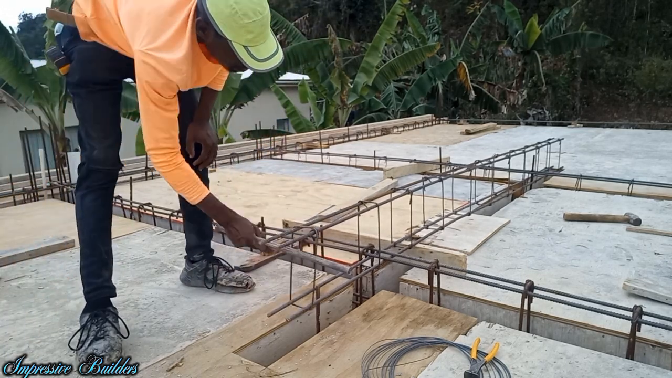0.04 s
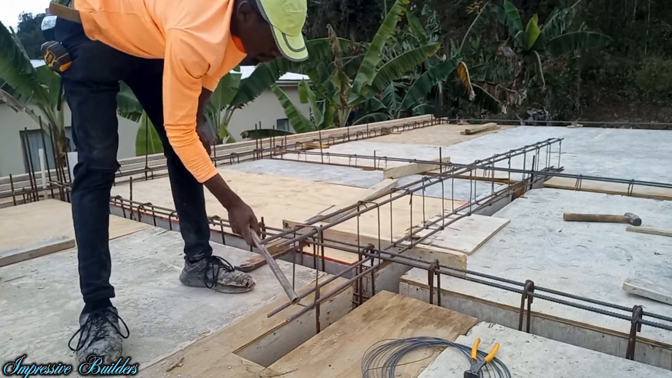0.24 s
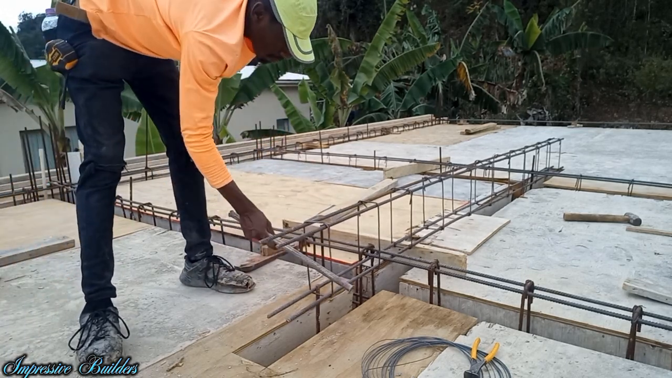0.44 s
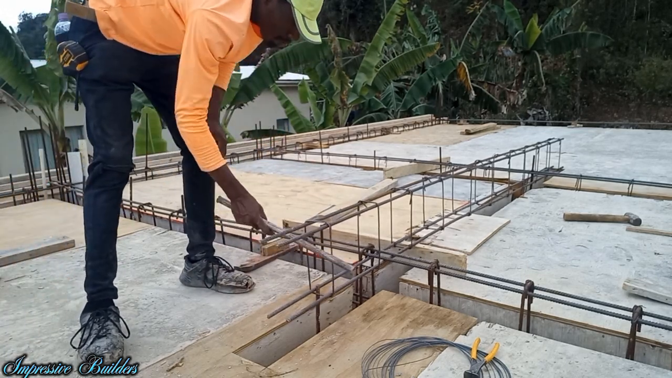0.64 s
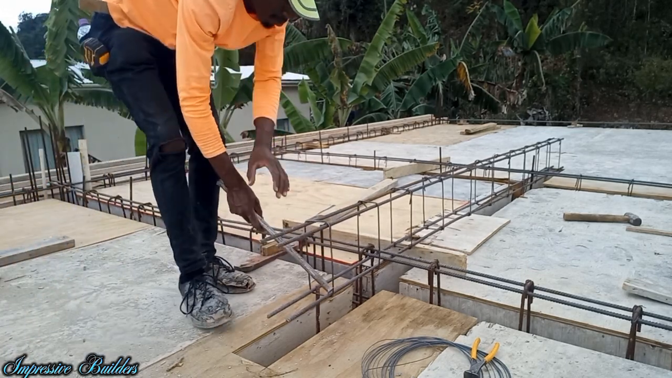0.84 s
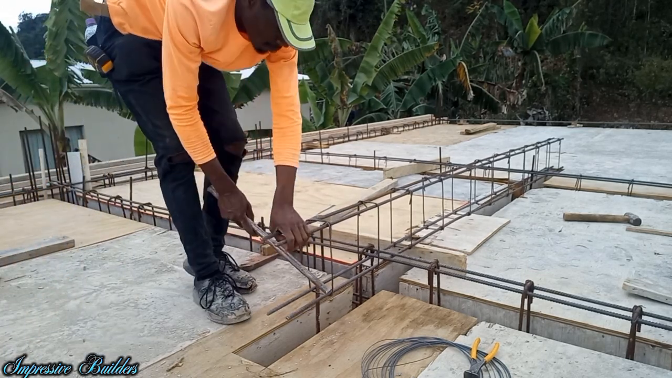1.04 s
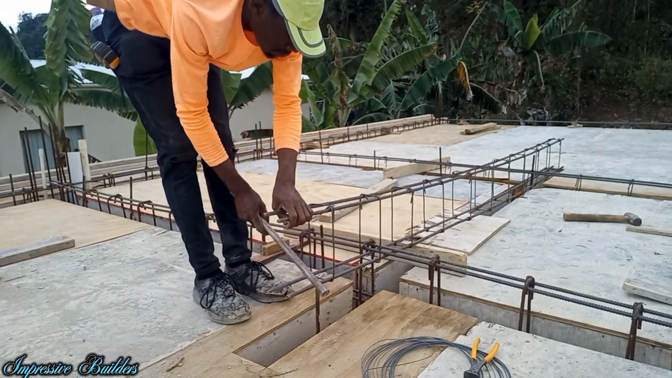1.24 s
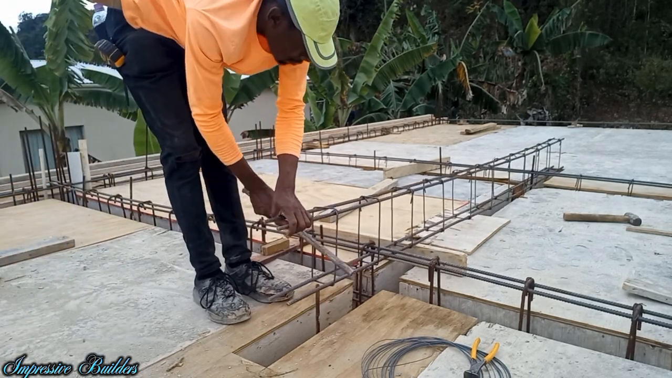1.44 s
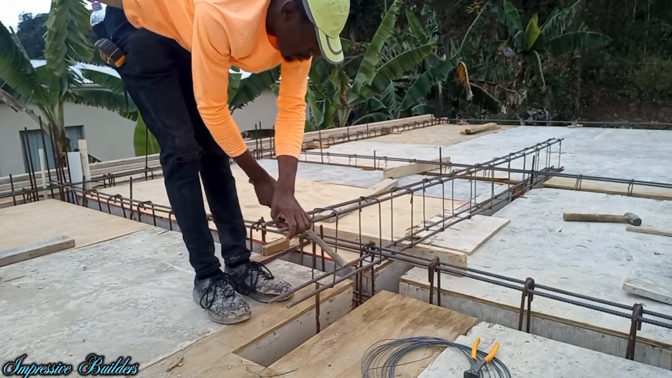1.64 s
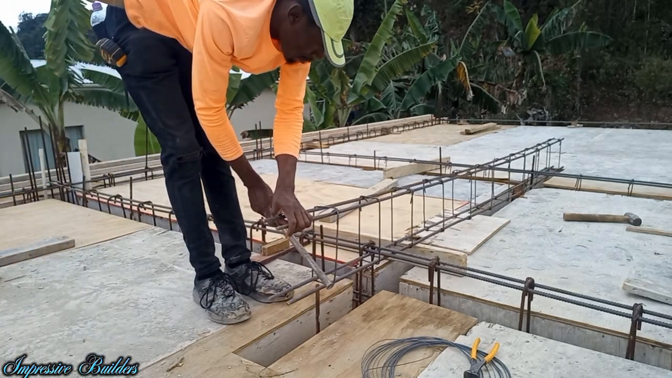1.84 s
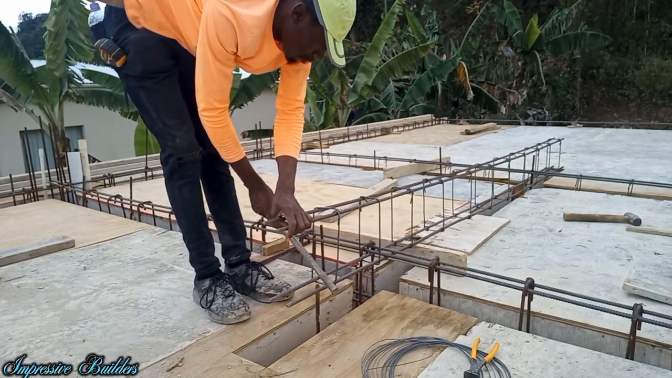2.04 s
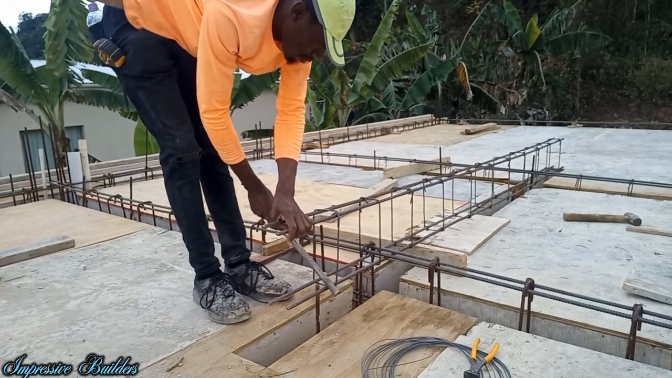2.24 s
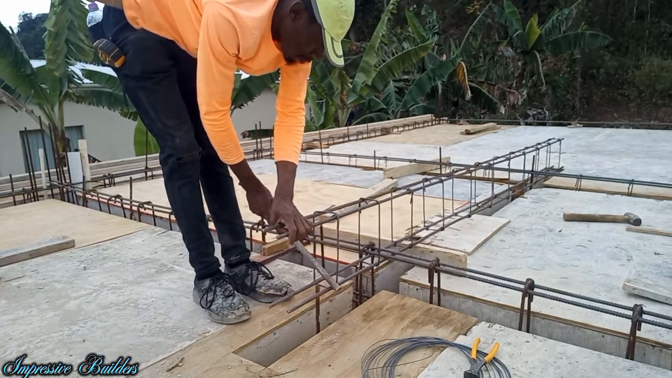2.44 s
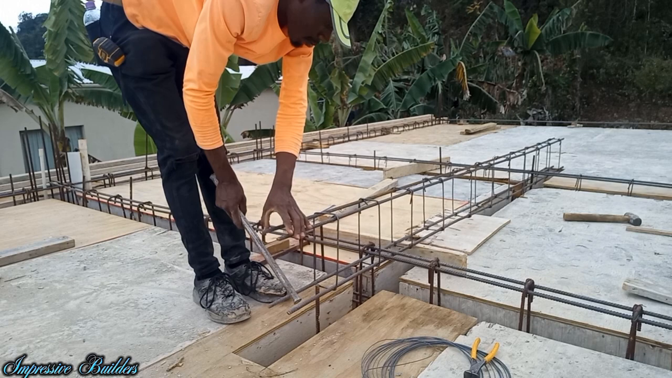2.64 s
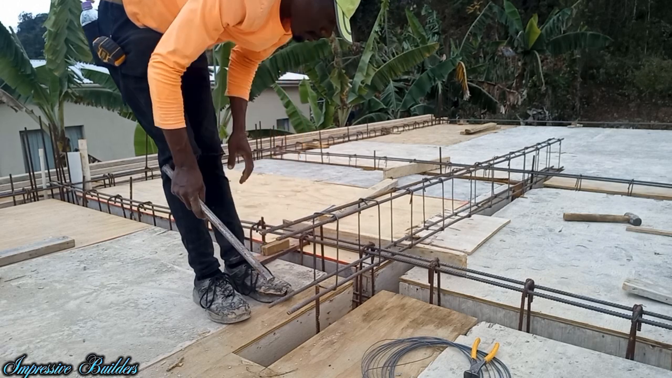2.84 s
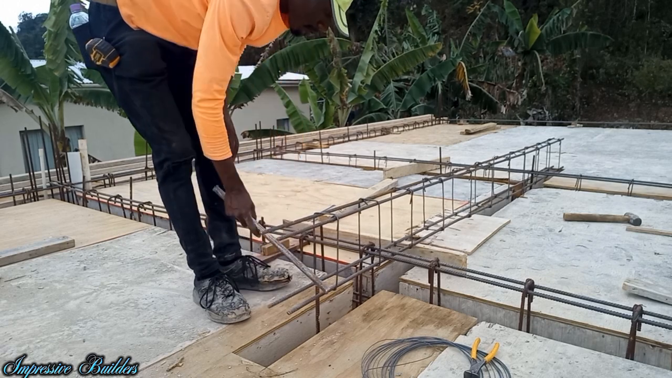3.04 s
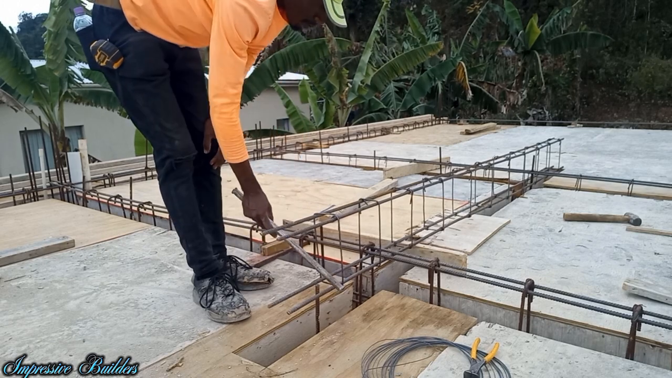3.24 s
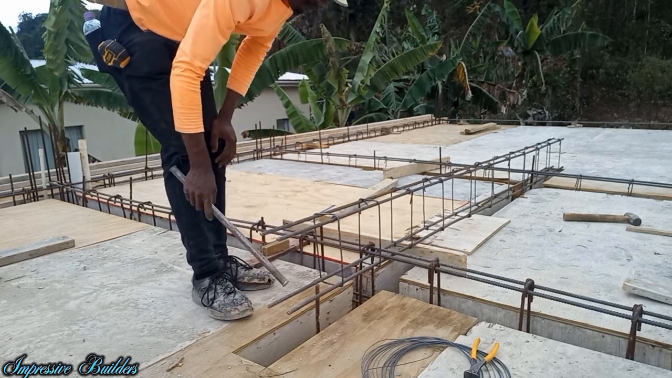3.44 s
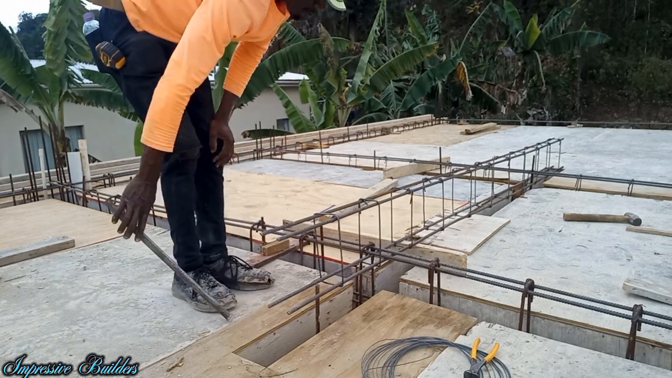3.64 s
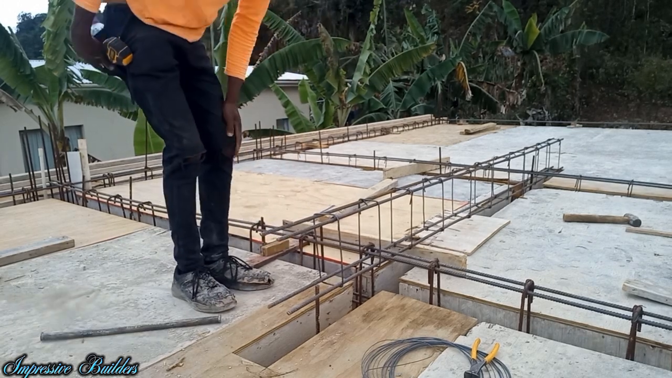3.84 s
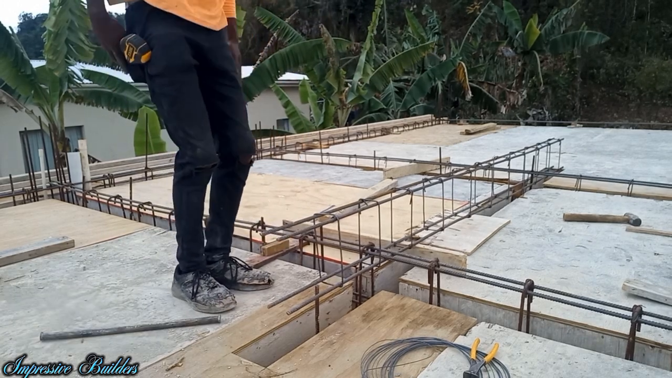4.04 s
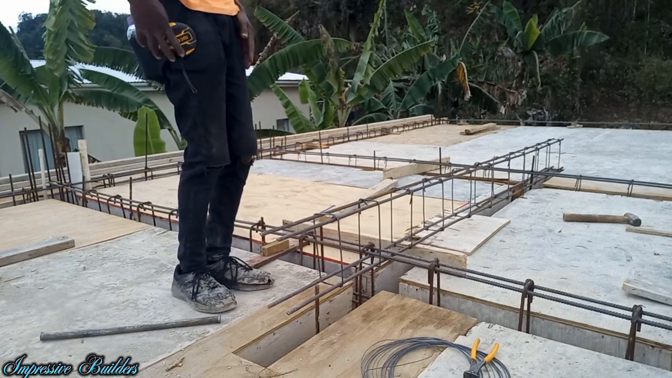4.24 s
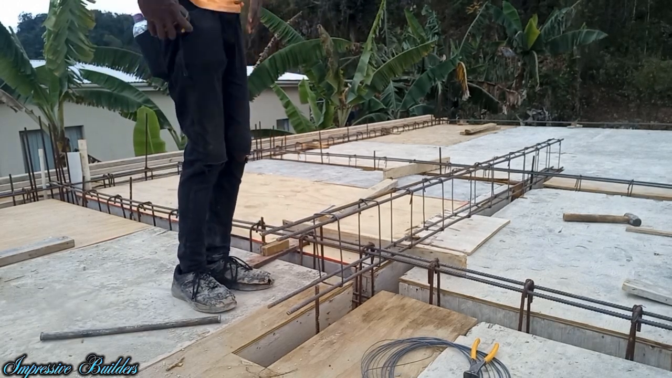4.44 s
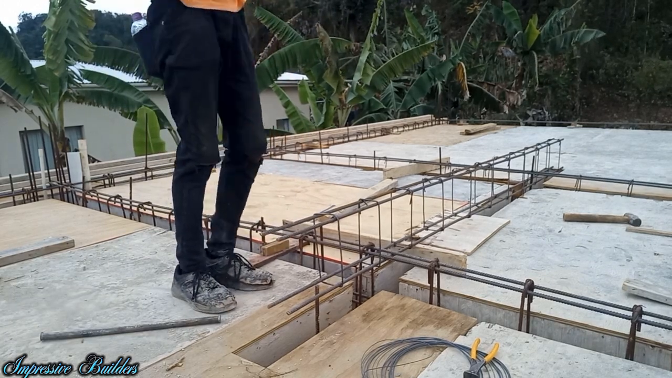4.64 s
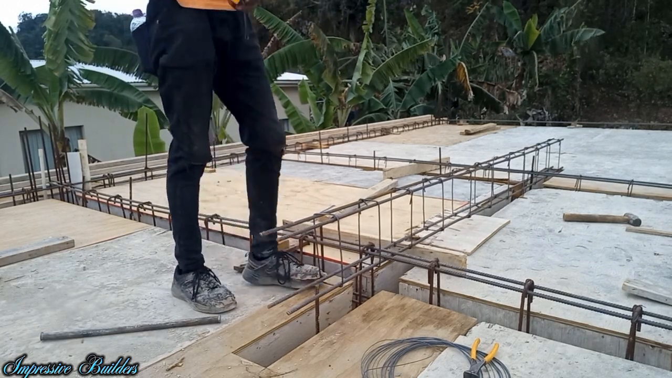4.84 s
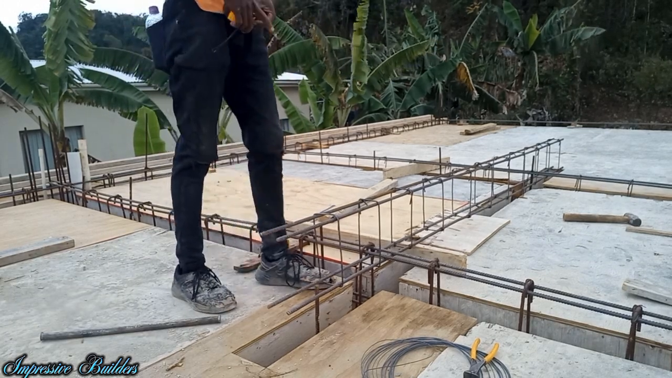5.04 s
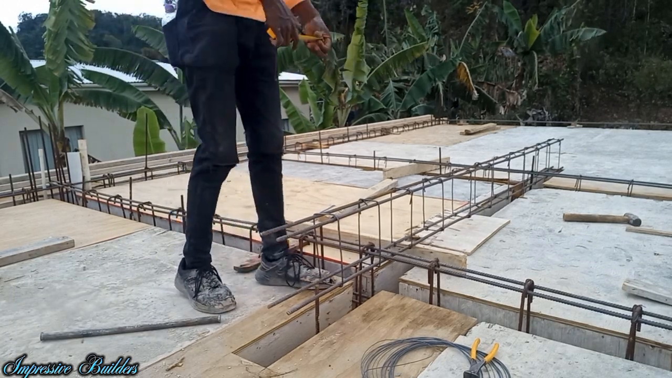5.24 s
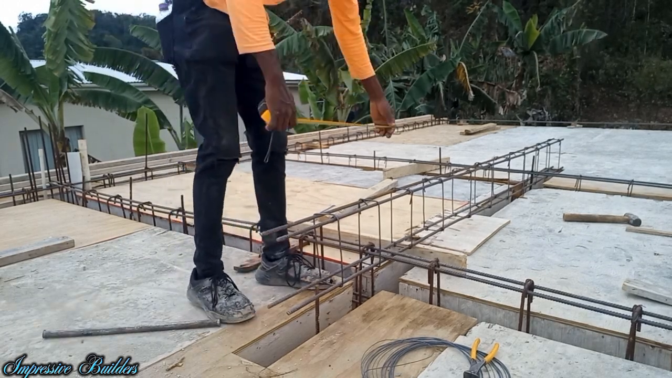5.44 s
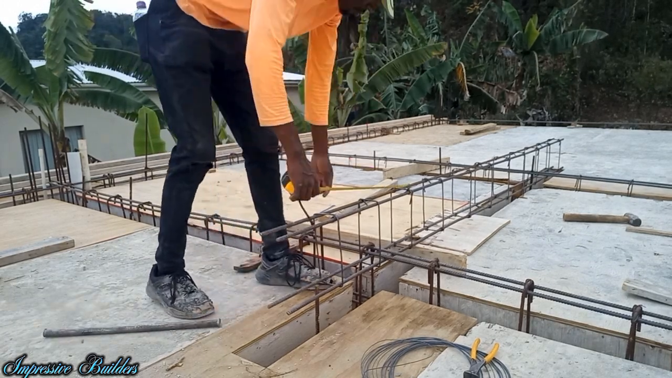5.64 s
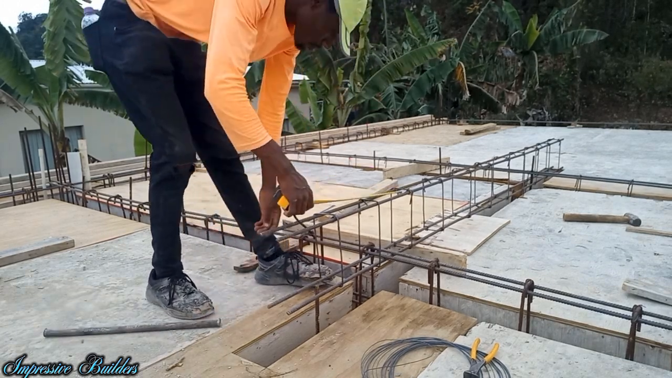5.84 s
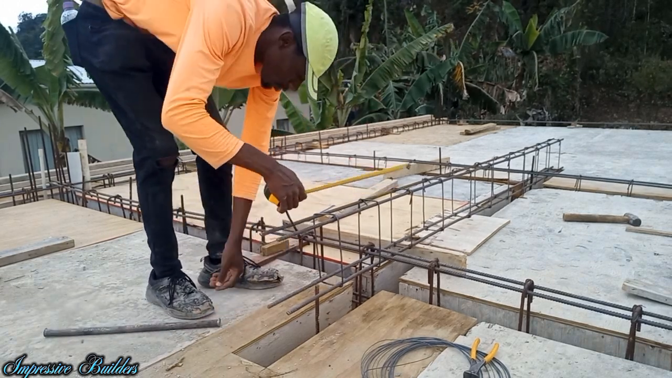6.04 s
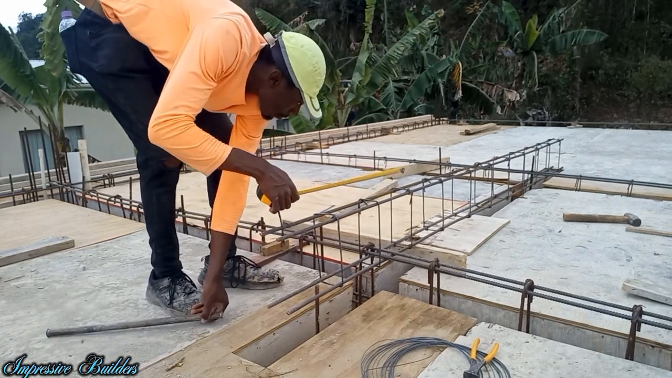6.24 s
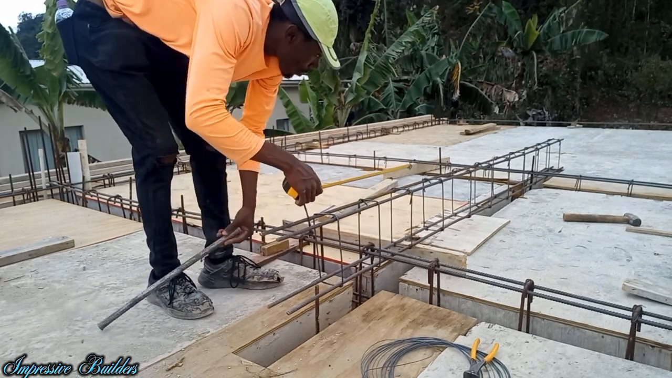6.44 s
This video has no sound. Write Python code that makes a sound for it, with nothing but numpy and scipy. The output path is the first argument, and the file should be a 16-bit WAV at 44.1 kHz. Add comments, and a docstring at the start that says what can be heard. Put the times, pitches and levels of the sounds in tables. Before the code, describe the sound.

Short, irregular rasping clanks of ribbed steel against steel stirrups come first, with a faint wooden shudder beneath. Then a bar falls, touching lightly and slamming hard on the wooden deck, clattering and humming briefly. Near silence with boot scuffs and cloth follows, then a crisp snap and drawn tape hiss, and finally soft clinks as the bar is picked up. Close, dry outdoor pickup with a faint air hush.

```python
"""A steel bar knocks along the stirrups of a rebar cage: gritty bursts of friction ring the steel's modes.
The loose bar drops on a plywood deck and is later picked up: noise cracks, dying deck modes, rattle and hum.
Boots, cloth and a tape drawn along the cage add shaped hiss and short ticks; the deck shudders underneath.
Faint sine hoots and the soft hush of open air, both quiet, complete the scene."""
import sys
import numpy as np
from scipy import signal
from scipy.io import wavfile
from scipy.ndimage import uniform_filter1d

SR = 44100
rng = np.random.default_rng(int(sys.argv[2]) if len(sys.argv) > 2 else 0)


def master_out(mix):
    """Clip the mix to full scale and print it as 16-bit PCM to the path in sys.argv[1]."""
    frames = np.transpose(np.atleast_2d(mix))
    ceiling = np.clip(frames, -1, 1)
    pcm = np.round(ceiling * 32767).astype(np.int16)
    wavfile.write(sys.argv[1], SR, pcm)


N = 287080

# Hush of open air: (frequency [Hz], relative level [dB per Hz])
AIR_SPECTRUM = [(18, -43), (30, -17.5), (112, 2), (174, -15.5), (345, -11.5), (540, -5), (822, -21),
                (962, -17), (14400, -27), (16000, -45.5)]
AIR_DB = -73.5
# Faint soft hoots: (time [s], length [s], frequency [Hz], level [dB])
HOOTS = [(2.638, 0.067, 968, -60.5), (2.701, 0.049, 958, -69), (2.861, 0.023, 1930, -75),
         (3.031, 0.038, 920, -64), (3.681, 0.072, 1890, -57), (4.255, 0.032, 531, -55),
         (4.302, 0.033, 560, -58.5), (4.674, 0.13, 522, -72.5), (2.743, 0.077, 604, -69.5),
         (2.798, 0.087, 610, -71.5), (4.743, 0.1, 654, -69.5), (4.9, 0.096, 638, -67.5),
         (5.191, 0.041, 1530, -65.5), (2.038, 0.051, 1840, -61)]

# Low shudder of the deck: (frequency [Hz], relative level [dB per Hz])
RUMBLE_SPECTRUM = [(15, -53.5), (25, -17.5), (76, -1), (119, 2.5), (150, -4), (196, 1), (341, -18.5),
                   (594, -18.5), (776, -28.5), (1150, -21.5), (1260, -27), (1800, -27), (2340, -66),
                   (3960, -120)]
# Ring of plywood on joists: (frequency [Hz], level [dB], t60 [s])
DECK_MODES = [(69.03, -22, 0.069), (111, -21, 0.19), (154.5, -7, 0.25), (226, -10.5, 0.18),
              (281, -14.5, 0.19), (342, -0.2, 0.038), (414, -9, 0.098), (469, -16, 0.1), (527, -14, 0.1),
              (558, -22.5, 0.15), (666, -22, 0.22), (766, -33.5, 0.13), (894, -40.5, 0.25)]
# The deck answers every push late and slowly
DECK_LAG_S, DECK_SWELL_S, DECK_HOLD_S, DECK_T60_S = 0.018, 0.017, 0.0084, 0.37
BLOW_SHUDDER_DB, BLOW_SHUDDER_S = -34, 0.061  # after each contact of the loose bar

# Rubs of boots, cloth and tape:
# (time [s], swell [s], hold [s], level [dB], share of dull scuff [0-1], deck level [dB])
RUBS = [(0.791, 0.011, 0.004, -65.5, .4, -51), (0.94, 0.013, 0.015, -55, 1, -61),
        (1.049, 0.022, .005, -60, 1, -61), (1.107, 0.051, 0.11, -60.5, 1, -48.5),
        (2.583, 0.021, .02, -75, 0.5, -62), (2.64, 0.035, .08, -76.5, 0.7, -64.5),
        (2.99, .02, .06, -63, 0, -78), (3.064, 0.11, 0.013, -57, 1, -62.5),
        (3.123, 0.022, 0.027, -45, .7, -47), (3.475, 0.033, 0.076, -67, 0.46, -65),
        (3.577, 0.056, 0.032, -44.5, 1, -56), (4.1, 0.065, 0.011, -71.5, 0.4, -66),
        (4.22, 0.039, .02, -69.5, 0.1, -70.5), (4.327, 0.32, 0.013, -61, 0.86, -88.5),
        (4.39, 0.086, 0.15, -67.5, 0.4, -87.5), (4.554, .012, 0.036, -70.5, 0.13, -95),
        (4.754, 0.037, 0.018, -63, .95, -64.5), (4.978, 0.047, 0.039, -66, 1, -68),
        (5.05, .02, 0.17, -71, 0.72, -78), (5.218, 0.024, 0.22, -57.5, 0.36, -67.5),
        (5.463, 0.055, .09, -51.5, 0.28, -47.5), (5.6, 0.038, .04, -50, 0.75, -49),
        (5.646, 0.035, 0.092, -37.5, 0.01, -56.5), (5.657, 0.06, .03, -40, 1, -50.5),
        (5.847, 0.029, 0.025, -36, 0, -74), (5.945, 0.061, 0.085, -35, 0.78, -43),
        (6.12, 0.024, .1, -59, 0, -66.5), (6.269, 0.055, 0.03, -55, 0.4, -45),
        (6.4, .05, 0.063, -61, 0.4, -59), (6.5, 0.012, .02, -47.5, 0, -49)]
# Hiss of cloth and tape: (frequency [Hz], relative level [dB per Hz])
FINE_SPECTRUM = [(880, -34), (1500, -20), (5940, -6.5), (6420, -2), (8670, -11), (12400, -12.5),
                 (15200, -3.5)]
# Sole on grit: (frequency [Hz], relative level [dB per Hz])
SCUFF_SPECTRUM = [(180, -25.5), (300, -5.5), (961, -4), (1170, -7), (1410, -7.5), (2070, -5.5),
                  (12100, -14.5), (15200, -17), (16000, -32.5)]
SWELL_DB, FINE_T60_S, SCUFF_T60_S = 28, 0.1, 0.19  # SWELL_DB is the climb over one swell time

# Small ticks of wire, tape and grit:
# (time [s], level [dB], brightest [Hz], left over right [dB], knock level [dB], knock pitch [Hz])
TICKS = [(0.815, -45.5, 3440, 4.5, -37, 400), (1.035, -48.5, 3760, 0, -72, 915),
         (1.103, -63, 3070, 7, -58, 525), (1.1734, -48, 11800, -9, -57, 430),
         (1.2448, -50, 2540, 1.5, -44.5, 504), (1.286, -52, 7410, 2, -76, 507),
         (4.2103, -74, 5200, -2.5, -61, 1195), (4.2614, -53, 4760, 2, -60, 557),
         (4.475, -61.5, 9000, 4, -60, 514), (4.5196, -38.5, 10800, 3, -40, 1423),
         (4.9776, -56.5, 3130, 4, -55.5, 553), (5.027, -55, 6520, 0, -47, 510),
         (5.215, -49, 3920, -1, -58, 1490), (5.2555, -60, 3600, 4, -59.5, 367),
         (5.3109, -47.5, 3990, 0.5, -52.5, 1340), (5.455, -47, 2200, 4, -42, 550),
         (5.4645, -47, 2030, 0, -44.5, 890), (5.5185, -40, 4000, -2, -46.5, 1500),
         (5.5817, -36, 4400, .6, -37, 607), (5.64, -14.5, 14100, 1, -37, 420),
         (5.6781, -32.5, 4430, 3, -33.5, 710), (5.913, -23.5, 7240, -2, -67, 1700),
         (6.098, -39.5, 6640, -3, -67, 353), (6.175, -49.5, 5800, -0.5, -78, 447),
         (6.2412, -49.5, 6260, 4.5, -63, 545), (6.3175, -51, 4510, 6, -57, 850),
         (6.3765, -57, 2430, 7, -51, 830), (6.4444, -49, 6500, -3, -65, 526)]
# Dull knock under a tick: (multiple of the knock pitch [ratio], relative level [dB per Hz])
KNOCK_SPECTRUM = [(.3, -31), (.7, -12), (1., 6), (1.4, -4), (3., -11.5), (8., -41.5)]
TICK_T60_S, RUSTLE_DB = 0.018, -10.5

# The loose bar meets the deck:
# (time [s], level [dB], ring [dB], crack [dB], rattle hold [s], ring of the lifted end [dB])
BLOWS = [(3.726, -19.5, -36, -15.5, .19, -33.5), (3.8318, 1.5, -38.5, -12, 0.055, -47),
         (6.272, -48, -45, -8.5, 0.046, -9.5), (6.394, -34, -50, 0, 0.025, -26),
         (6.5, -24.5, -43, -9, 0.045, -45)]
# Bar lying loose, decays including the rattle: (frequency [Hz], level [dB], t60 [s])
BAR_MODES = [(1174, -16, 0.95), (2245, -7, 0.45), (3585, -19, 0.5), (4840, -22, 0.25), (5437, -20, 0.19),
             (5577, -26, 0.19), (6498, -25, 0.24), (6961, -15, 0.23), (7364, -11, 0.21), (7946, -8, 0.16),
             (8710, -29, 0.38), (8926, -8, 0.22), (9426, -10, 0.17), (10080, -22, 0.25), (10190, -15, 0.21),
             (10650, -28, 0.36), (11040, -19, 0.21), (11350, -24, 0.31), (11490, -25, 0.22),
             (11750, -5, 0.22), (12040, -22, 0.23), (12310, -18, 0.39), (12710, -7, 0.17),
             (12970, -17, 0.39), (13280, -40, 0.85), (13510, -20, 0.21), (13780, 0, 0.22),
             (14010, -16, 0.19), (14650, -4, 0.25), (15060, -8, 0.33)]
# Bar with one end off the deck: (frequency [Hz], level [dB], t60 [s])
LIFTED_MODES = [(2240, -5, .3), (3590, -2.5, .15), (4775, -8, .12), (5212, -2.5, .15), (7050, -4.5, .15),
                (11600, -8.5, .15)]
# Crack of bar on plywood: (frequency [Hz], relative level [dB per Hz])
CRACK_SPECTRUM = [(120, -9.5), (200, -7), (500, -4), (1480, -13), (3560, -23.5), (6170, -34), (8740, -49),
                  (14900, -49), (16000, -55)]
TREBLE_DECAY_HZ = 3300  # treble t60 = table t60 * TREBLE_DECAY_HZ / frequency

# The bar grinds on steel: (time [s], level [dB], run-up [s], first bite [dB], grind [s], ring [dB],
# treble [dB], high note [dB], clank [Hz], deck level [dB])
STROKES = [(0.074, -22.5, 0.025, 0.5, 0.041, -0.5, 3.5, -33.5, 7030, -40.5),
           (.389, -27.5, 0.017, -6, 0.043, 4.5, 6, -27, 2286, -44.5),
           (.691, -33.5, 0.03, 6, 0.004, -11, -1, -11.5, 3640, -47.5),
           (1.201, -60, .011, 21, 0.004, -28, 18, 2, 11600, -45.5),
           (1.374, -23, 0.025, 9, 0.015, -4, 2.5, -23, 10000, -37.5),
           (1.632, -34.5, 0.023, 14.5, 0.015, -5.5, -1, 3.5, 1033, -40.5),
           (1.809, -29.5, 0.026, 7, 0.0025, -1.5, 5, -14, 3593, -44.5),
           (1.976, -32, 0.023, 11.5, 0.003, -4.5, 4, -11, 6970, -45),
           (2.147, -32.5, 0.021, 6.5, 0.016, -5.5, 1, -6, 7270, -41.5),
           (2.307, -42.5, 0.026, 3.5, 0.0049, 2, -12, -16, 7070, -42.5),
           (2.328, -36, .013, 7.5, 0.0079, 0.5, 3, -6, 5290, -46),
           (2.452, -40, .0049, 1.5, 0.0053, -13, -20, -18.5, 920, -42.5),
           (2.49, -34, 0.004, 5.5, 0.0019, -3.5, 0.5, -28, 2210, -41),
           (3.157, -34, 0.0062, 8.5, 0.014, 10, 5.5, -10, 3720, -37.5),
           (6.316, -57.5, 0.012, 7, .018, -4, -10, -21, 3630, -42.5),
           (6.367, -53, .018, 3, 0.0046, 0, -6, -11, 8800, -40),
           (6.394, -40.5, 0.027, 2, 0.0027, -13, -7, 9, 5340, -43)]
# Steel grinding on steel: (frequency [Hz], relative level [dB per Hz])
GRIND_SPECTRUM = [(290, -52), (500, -22), (979, -7.5), (1660, -14), (2270, -4.5), (3250, -8.5),
                  (3590, -3.5), (6090, -8.5), (6830, -5.5), (8830, -6.5), (15200, 2)]
# Short-lived ring of bar and cage in contact: (frequency [Hz], level [dB], t60 [s])
CAGE_MODES = [(380, -14, .1), (960, -9, .05), (1550, -12, .03), (2210, -8, .03), (3590, -4, .05),
              (5100, -7, .03), (6960, -4, .04), (7700, -6, .025), (8800, -6, .03), (9960, -1, .035),
              (11000, -4, .025), (11650, -1, .03), (12500, -1, .035), (12940, -1, .035), (13300, -4, .03),
              (15000, -5, .025)]
# High note, shifting with the grip: (time [s], frequency [Hz])
HIGH_NOTE = [(1., 14130), (1.3, 14010), (3.3, 14010), (6., 14140)]
STROKE_T60_S, CLANK_DB = 0.094, -9.5
TREBLE_FROM_HZ, TREBLE_TOP_HZ = 8700, 12500

# Lag of the right channel, set by where the work is: (from time [s], delay [ms])
RIGHT_LATE = [(0, .02), (3.4, .12), (3.82, .25), (4.15, .15), (6.24, .25)]
EDGE_HZ = 16400  # upper band limit


def amp(db):
    """Gain of a level in dB."""
    return 10 ** (np.asarray(db) / 20)


def evened(x):
    """Scales to an rms of one."""
    return x / np.sqrt(np.mean(x ** 2) + 1e-20)


def add(mix, s, sound):
    """Lays a sound into the mix at s seconds."""
    part = mix[..., round(s * SR):][..., :sound.shape[-1]]
    part += sound[..., :part.shape[-1]]


def colour(x, points):
    """Shapes a sound with a causal minimum-phase filter of energy one drawn through spectrum points."""
    f, db = np.transpose(points)
    hz = abs(np.fft.fftfreq(8192, 1 / SR))
    drawn_db = np.interp(np.log(hz + 1), np.log(f + 1), db)
    log_gain = np.log(amp(np.maximum(drawn_db, -100)))
    phase = -signal.hilbert(log_gain).imag
    taps = np.fft.ifft(np.exp(log_gain + 1j * phase)).real[:4096]
    return signal.oaconvolve(x, taps[None] / np.linalg.norm(taps), axes=1)[:, :x.shape[1]]


def pair(count, same, grain_db=0):
    """Two-channel noise, partly shared; uneven grain sizes make it gritty."""
    a, b, size = rng.standard_normal((3, count))
    same = np.clip(same, 0, 1)
    right = same * a + np.sqrt(1 - same ** 2) * b
    return evened(np.array([a, right]) * amp(grain_db * size))


def wander(count, depth_db, smooth):
    """Random gain with an rms swing of depth_db, smoothed over a number of samples."""
    return amp(depth_db * evened(uniform_filter1d(rng.standard_normal(count), size=smooth)))


def modes(table, seconds, spread, vary_db=0):
    """Dying sines with random strength, as contact points vary; each channel has its own phases."""
    t = np.arange(round(seconds * SR)) / SR
    left, right, luck = rng.standard_normal((3, len(table), 1))
    hz, db, t60 = np.transpose(table)[..., None]
    fading = amp(db + vary_db * luck - 60 * t / t60)
    return np.array([(fading * np.sin(2 * np.pi * hz * t + spread * phase)).sum(0) for phase in (left, right)])


def rung(drive, body):
    """Passes a force through a ringing body of energy one."""
    body = body / np.sqrt((body ** 2).sum(1).mean())
    return signal.oaconvolve(drive, body, axes=1)[:, :drive.shape[1]]


def swells(rows, t60):
    """Joint envelope of events (time [s], swell [s], hold [s], gain): a rise, a hold and a fade."""
    t = np.arange(0, N + 64, 64) / SR
    s, swell, hold, gain = np.transpose(rows)[..., None]
    rise_db = SWELL_DB * np.maximum(s - t, 0) / abs(swell)
    fade_db = 60 * np.maximum(t - s - abs(hold), 0) / t60
    power = ((gain * amp(-rise_db - fade_db)) ** 2).sum(0)
    return np.interp(np.arange(N) / SR, t, np.sqrt(power))


def open_air():
    """Steady, wide, softly coloured noise for the hush of open air."""
    return amp(AIR_DB) * colour(pair(N, 0.18), AIR_SPECTRUM)


def hoots():
    """Soft sines that swell and fade, with a separate phase in each channel."""
    out = np.zeros((2, N))
    for s, length, hz, db in HOOTS:
        t = np.arange(round(length * SR)) / SR
        phase = rng.uniform(0, np.pi, (2, 1))
        swell = np.sin(np.pi * t / length) ** 2
        add(out, s, amp(db) * swell * np.sin(2 * np.pi * hz * t + phase))
    return out


def shudder():
    """Low lumpy noise and board ring, nearly mono, set off by strokes, blows and shifting weight."""
    pushes = [(s, grind, deck_db) for s, _, _, _, grind, *_, deck_db in STROKES]
    pushes += [(s, hold, deck_db) for s, _, hold, *_, deck_db in RUBS]
    pushes += [(s, BLOW_SHUDDER_S, BLOW_SHUDDER_DB + 0.25 * db) for s, db, *_ in BLOWS]
    rows = [(s + DECK_LAG_S, DECK_SWELL_S, DECK_HOLD_S + hold, amp(db)) for s, hold, db in pushes]
    level = swells(rows, DECK_T60_S)
    lumps = wander(N, 2.5, 900)
    noise = pair(N, .92)
    rumble = level * evened(colour(noise * lumps, RUMBLE_SPECTRUM))
    boards = evened(rung(level * noise, modes(DECK_MODES, .3, spread=0.07)))
    boards *= amp(-10) * np.sqrt(np.mean(level ** 2))
    return (rumble + boards) * amp([[.8], [-.8]])


def rubbing():
    """Friction hiss, blended from fine to dull, swelling and fading with each movement."""
    fine_rows, scuff_rows = [], []
    for s, swell, hold, db, share, _ in RUBS:
        share = np.clip(share, 0, 1)
        fine_rows.append((s, swell, hold, amp(db) * np.sqrt(1 - share)))
        scuff_rows.append((s, swell, hold, amp(db) * np.sqrt(share)))
    flutter = wander(N, 1.8, 120)  # the contact catches and slips
    fine = colour(pair(N, 0.092, grain_db=1.0), FINE_SPECTRUM)
    scuff = colour(pair(N, 0.033, grain_db=2), SCUFF_SPECTRUM)
    return flutter * (swells(fine_rows, FINE_T60_S) * fine + swells(scuff_rows, SCUFF_T60_S) * scuff)


def ticks():
    """Short dying bursts, each with one broad spectral peak and a knock passed to the deck."""
    out, t = np.zeros((2, N)), np.arange(6000) / SR
    for s, db, hz, pan_db, knock_db, knock_hz in TICKS:
        onset = 1 - np.exp(-t / 0.00091)
        fading = (amp(-60 * t / TICK_T60_S) + amp(RUSTLE_DB - 60 * t / 0.1)) * onset
        peak = [(hz / 30, -30), (hz / 4, -9), (hz, 0), (hz * 2, -6), (hz * 12, -14)]
        snap = amp(db) * colour(pair(len(t), 0.23, grain_db=-9.5) * fading, peak)
        knock_spectrum = KNOCK_SPECTRUM * np.array([knock_hz, 1])
        knock = amp(knock_db) * colour(pair(len(t), .9) * amp(-60 * t / .04), knock_spectrum)
        add(out, s, (snap + knock) * amp(pan_db * np.array([[.5], [-.5]])))
    return out


def blows():
    """A crack and the boom of the deck; the bar hums from the blow and rattles on its ribs."""
    out, t = np.zeros((2, N)), np.arange(SR) / SR
    bending = [(hz, db, t60) for hz, db, t60 in BAR_MODES if hz < 5000]
    # Treble modes die faster, as the rattle keeps driving them
    treble = [(hz, db, t60 * TREBLE_DECAY_HZ / hz) for hz, db, t60 in BAR_MODES[len(bending):]]
    ends = [row[0] for row in BLOWS[1:]] + [N / SR]
    for (s, db, ring_db, crack_db, rattle, lifted_db), end in zip(BLOWS, ends):
        boom = modes(DECK_MODES, 1, spread=.06) * .5
        crack_fade = amp(-60 * t / .02) + amp(-7.5 - 60 * t / 0.22)
        crack = colour(pair(len(t), .93) * crack_fade, CRACK_SPECTRUM)

        rattle_fade = amp(-60 * np.maximum(t - rattle, 0) / 0.24) * (1 - np.exp(-t / 0.0065))
        skips = pair(len(t), .2, grain_db=7.5) * wander(len(t), 2.7, 250) * rattle_fade
        clatter = rung(skips, modes(treble, .4, spread=2.5))
        clatter += amp(-9) * colour(skips, GRIND_SPECTRUM)

        rocking = wander(len(t), 1.5, 1500)  # contact comes and goes
        easing = amp(7.7 * t)  # losses ease once the bar lies still
        hum = amp(12) * modes(bending, 1, spread=0.32) * rocking * easing

        stilled = amp(lifted_db - 1500 * np.maximum(t - end + s, 0))  # the next contact stills it
        lifted = stilled * rung(skips, modes(LIFTED_MODES, 0.27, spread=.8))
        tick = amp(-22.5) * pair(len(t), .4) * amp(-60 * t / 0.006)  # steel meets grit
        sound = boom + lifted + tick + amp(crack_db) * crack + amp(ring_db) * (clatter + hum)
        add(out, s, amp(db) * sound)
    return out * amp([[.8], [-.8]])


def strokes():
    """Ribbed steel skids on steel: a swelling run-up, a bite, a grind and a tail, all ringing the cage."""
    out, t = np.zeros((2, N)), np.arange(SR // 2) / SR - .05  # time from the bite [s]
    note_t = np.arange(round(.4 * SR)) / SR
    for s, db, run_up, bite_db, grind, ring_db, treble_db, high_db, clank_hz, _ in STROKES:
        since_grind = np.maximum(t - grind, 0)
        before = amp(-7.0 - 37 * (t / run_up) ** 2)
        bite = amp(bite_db * np.exp(-abs(t) / 0.011))
        after = bite * amp(-60 * since_grind / STROKE_T60_S)
        push = uniform_filter1d(np.where(t < 0, before, after), size=120)
        settle = amp(-9.5 - 60 * since_grind / 0.29) * (t > 0)  # the cage keeps rattling
        chatter = wander(len(t), 2.5, 60)
        grit = pair(len(t), 0.21, grain_db=-0.5) * chatter

        # Another stirrup at every stroke
        stirrup = [(hz, -6, .045) for hz in rng.uniform(1500, 15000, size=60)]
        body = modes(CAGE_MODES + stirrup, 0.23, spread=1., vary_db=6.0)
        sound = colour(grit * (push + settle), GRIND_SPECTRUM)
        sound += amp(ring_db) * rung(grit * push, body)
        sound = colour(sound, [(TREBLE_FROM_HZ, 0), (TREBLE_TOP_HZ, treble_db)])
        clank = modes([(clank_hz, 0, .04)], .1, spread=1.0)
        sound += amp(CLANK_DB) * rung(grit * push, clank)

        high_hz = np.interp(s, *np.transpose(HIGH_NOTE))
        pair_of_notes = [(high_hz, 0, .26), (high_hz - 22, -7, .2)]  # a close pair beats
        note = modes(pair_of_notes, .4, spread=1.) * (1 - np.exp(-note_t / .012))
        add(out, s + grind / 2, amp(db + high_db) * note)
        add(out, s + t[0], amp(db) * sound)
    return out


def scene():
    """All sources together; the right channel lags a little, as sound from the left arrives later."""
    left, right = open_air() + hoots() + shudder() + rubbing() + ticks() + blows() + strokes()
    s, ms = np.transpose(RIGHT_LATE)
    spot = np.searchsorted(s, np.arange(N) / SR, "right") - 1
    late = np.round(ms * SR / 1000).astype(int)[spot]
    return np.array([left, right[np.maximum(np.arange(N) - late, 0)]])


def record(dry):
    """Loud peaks are rounded off, the deepest bass is dropped and the top is band-limited."""
    rounded = 1.095 * np.tanh(dry / 1.301)
    thin = signal.sosfilt(signal.butter(2, 42, "high", fs=SR, output="sos"), rounded)
    gentle_cut = signal.firwin(121, 15450, window=("kaiser", 4), fs=SR)
    soft = signal.oaconvolve(thin, gentle_cut[None], "same")
    band_limit = signal.firwin(511, EDGE_HZ, window=("kaiser", 9), fs=SR)
    return signal.oaconvolve(soft, band_limit[None], "same")


dry = scene()
out = record(dry)
master_out(out)
```